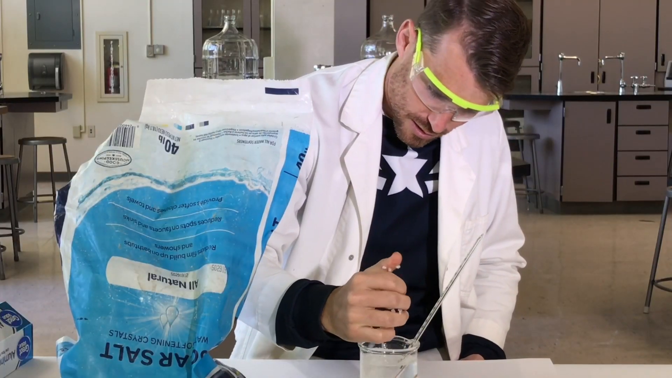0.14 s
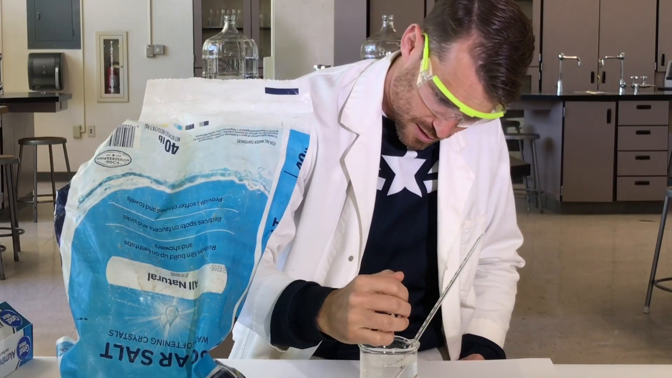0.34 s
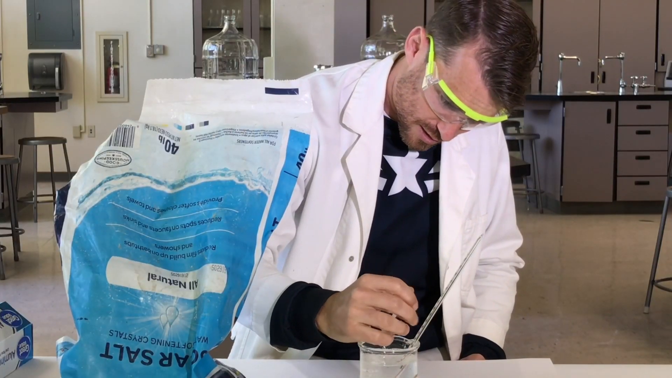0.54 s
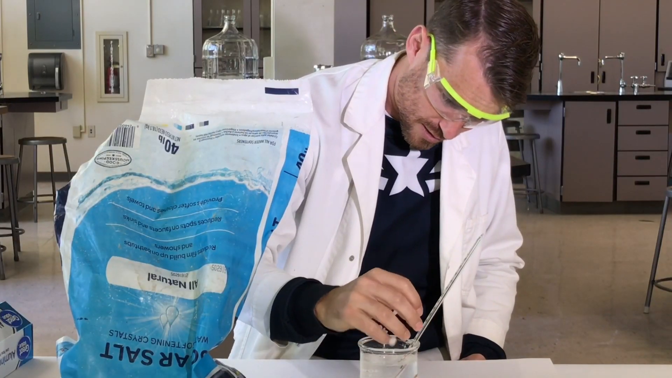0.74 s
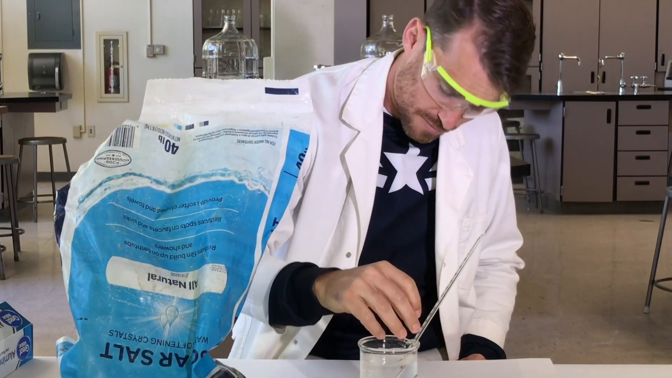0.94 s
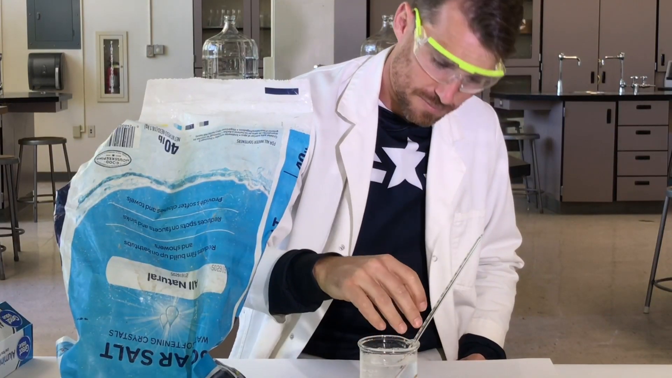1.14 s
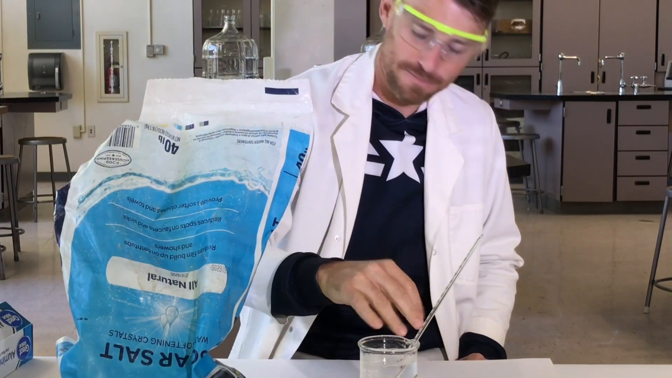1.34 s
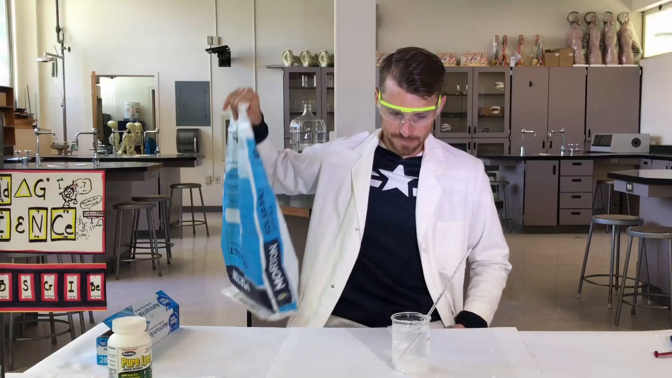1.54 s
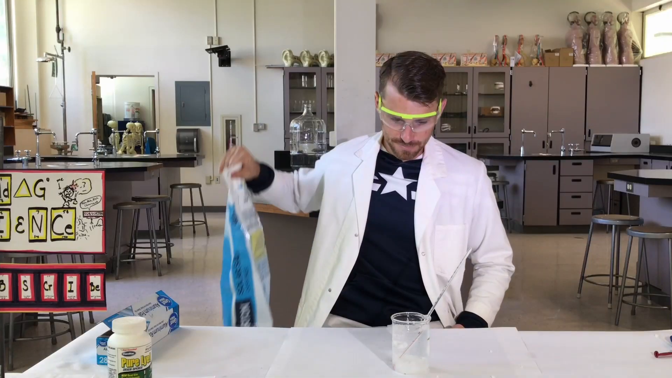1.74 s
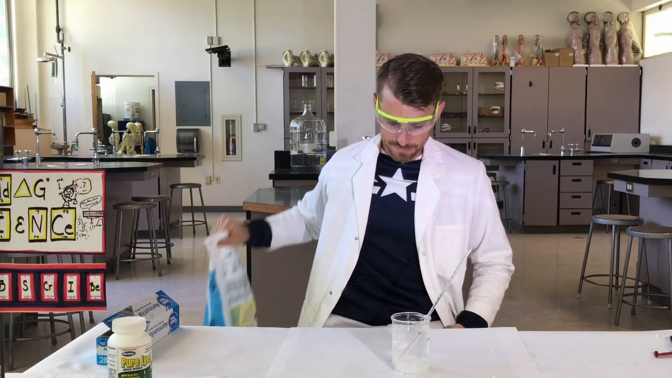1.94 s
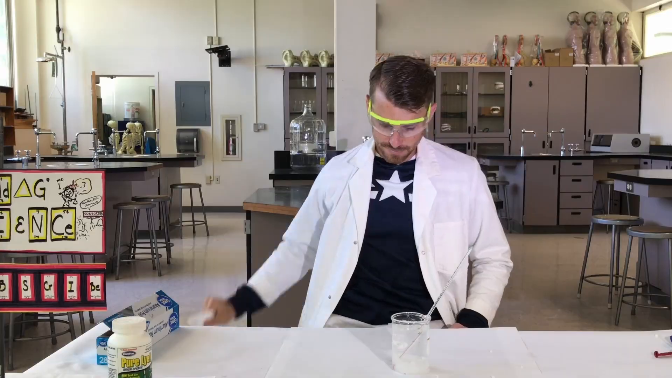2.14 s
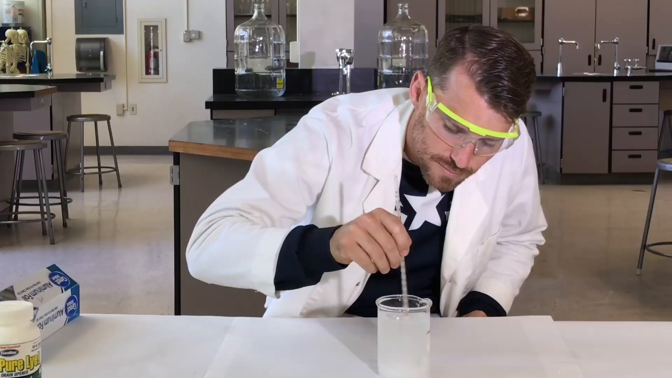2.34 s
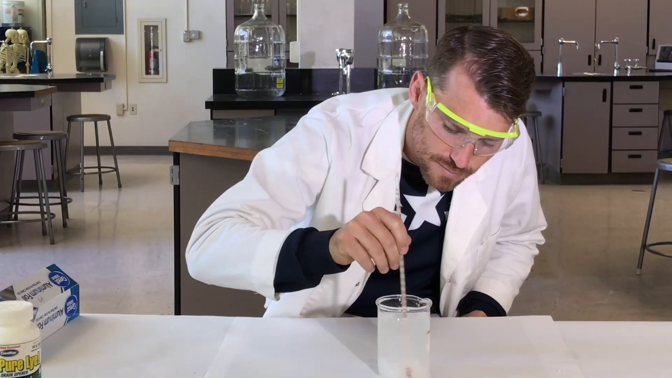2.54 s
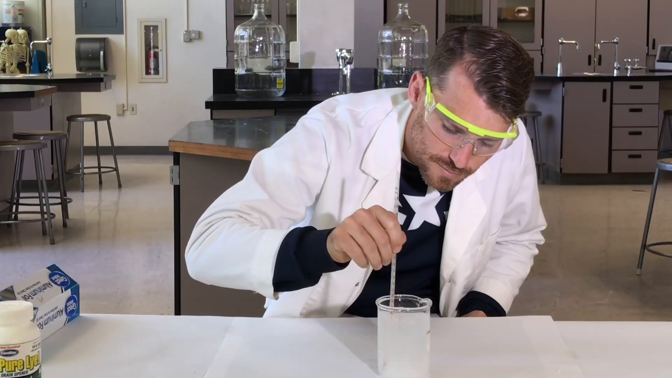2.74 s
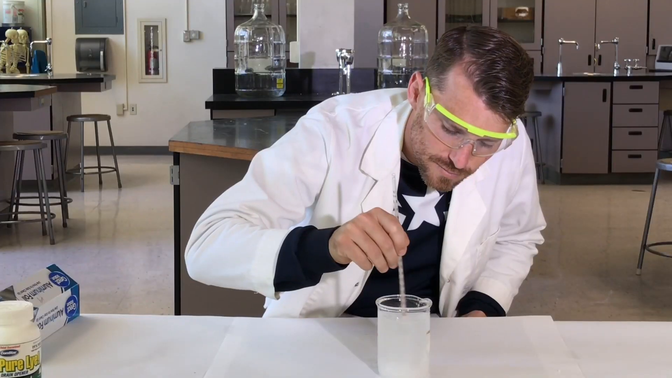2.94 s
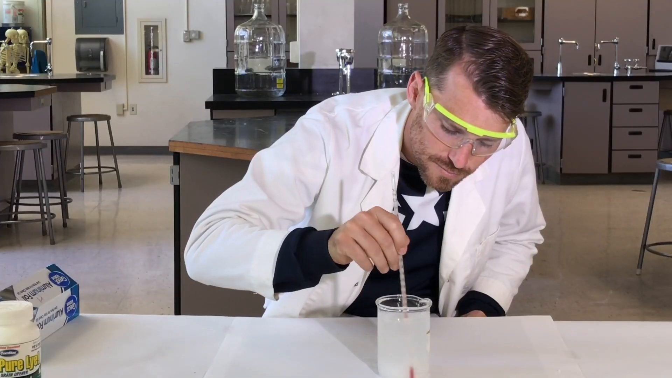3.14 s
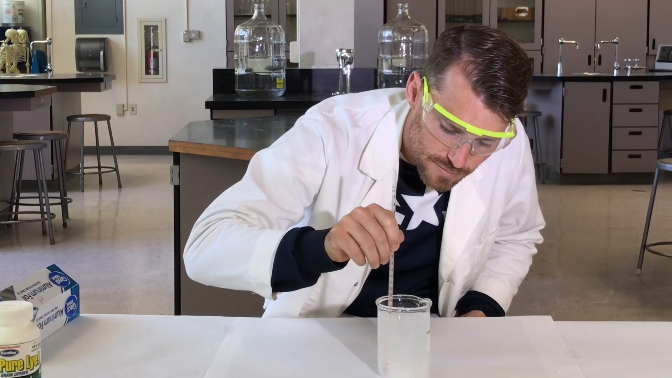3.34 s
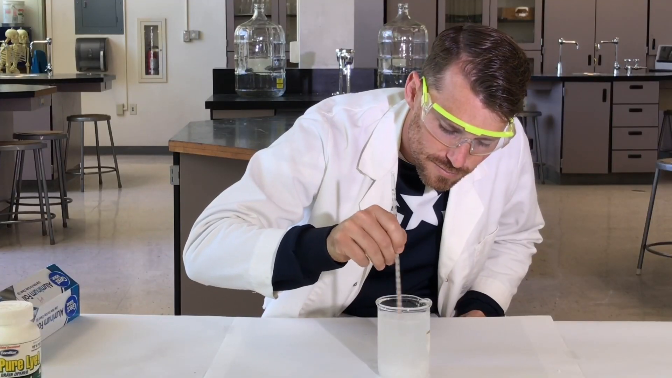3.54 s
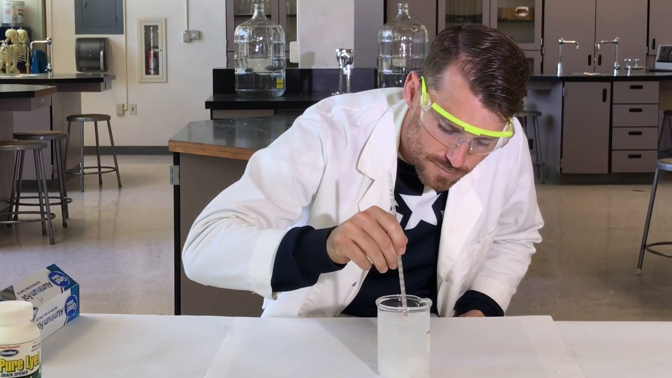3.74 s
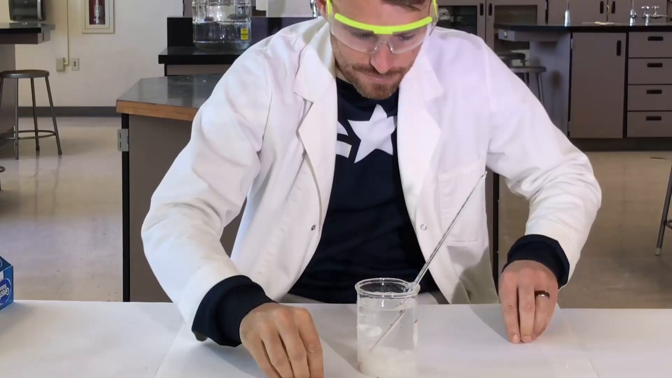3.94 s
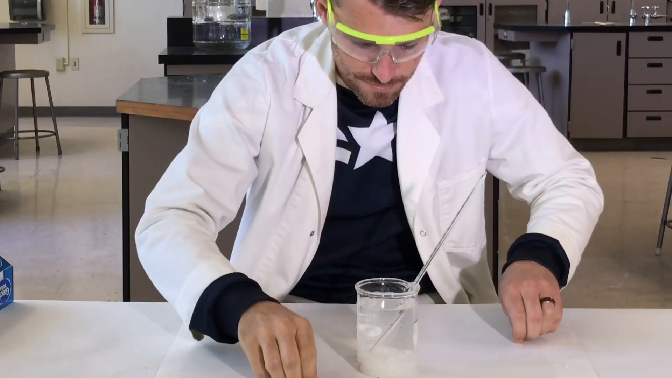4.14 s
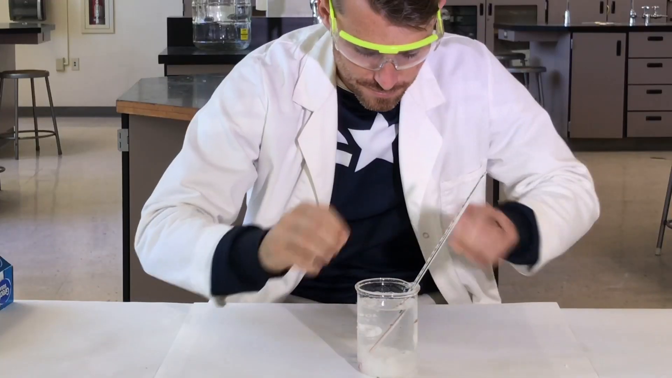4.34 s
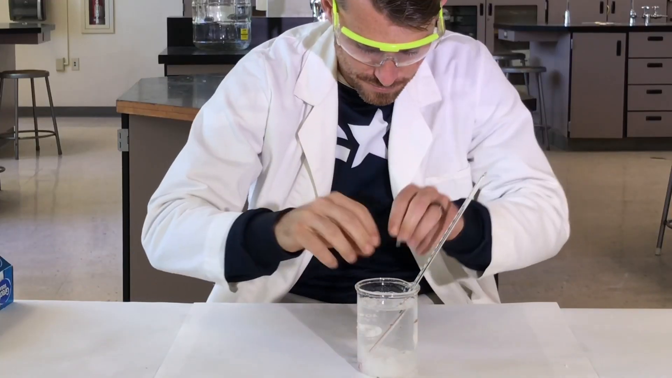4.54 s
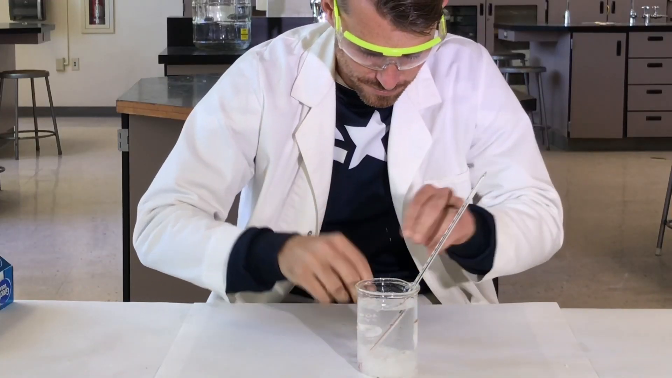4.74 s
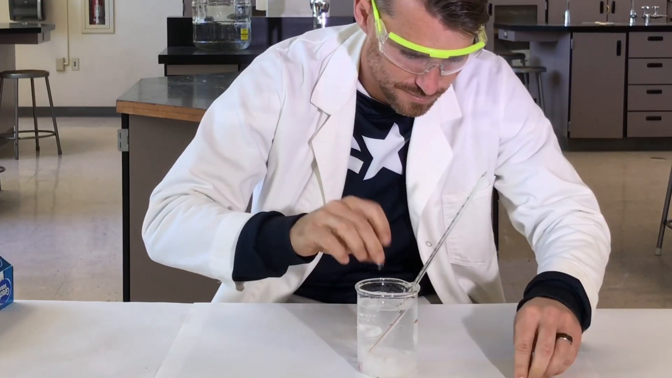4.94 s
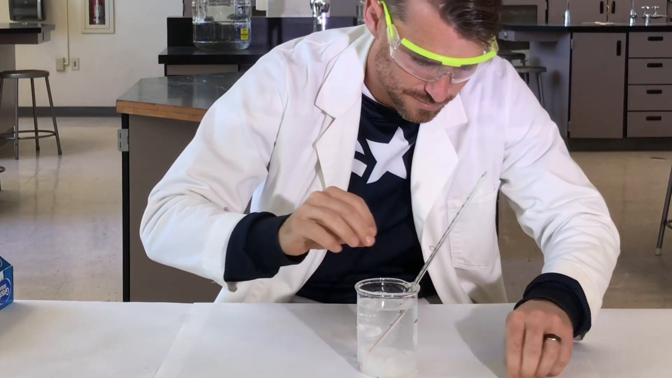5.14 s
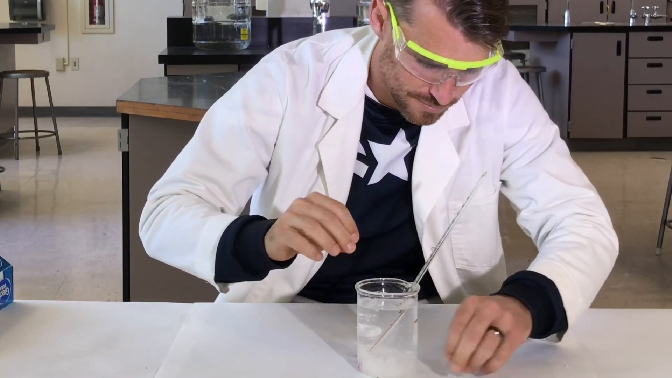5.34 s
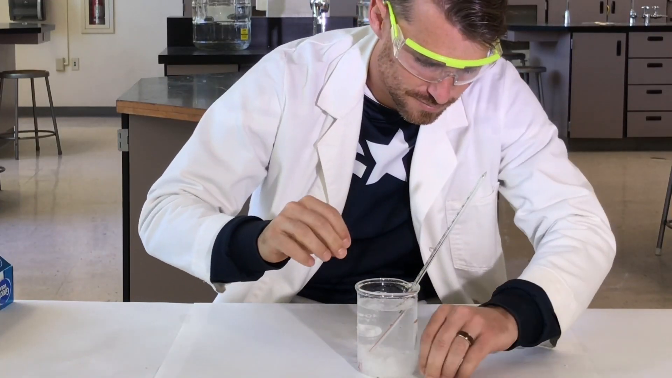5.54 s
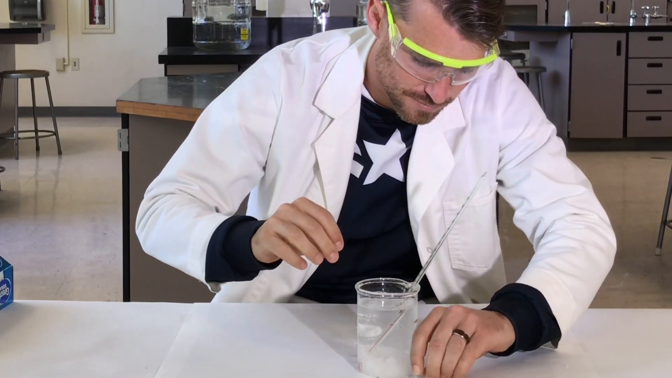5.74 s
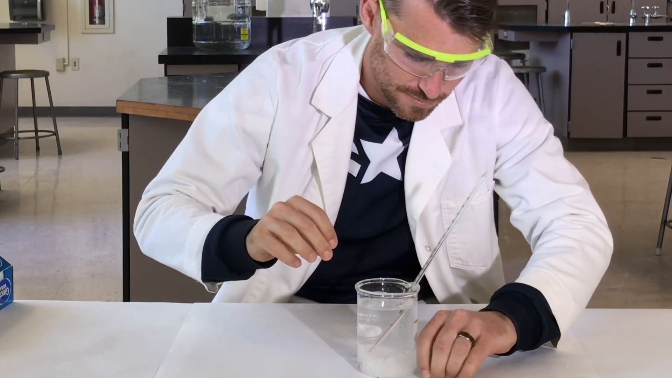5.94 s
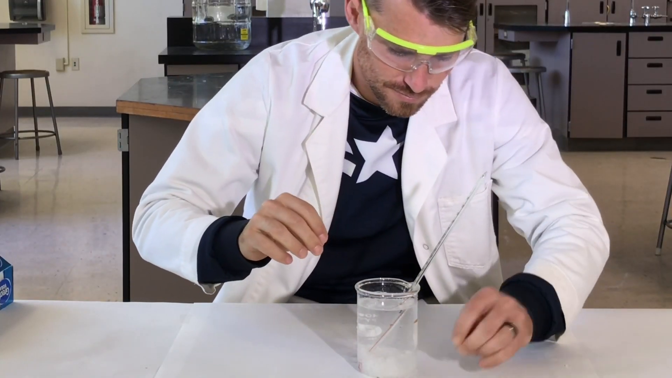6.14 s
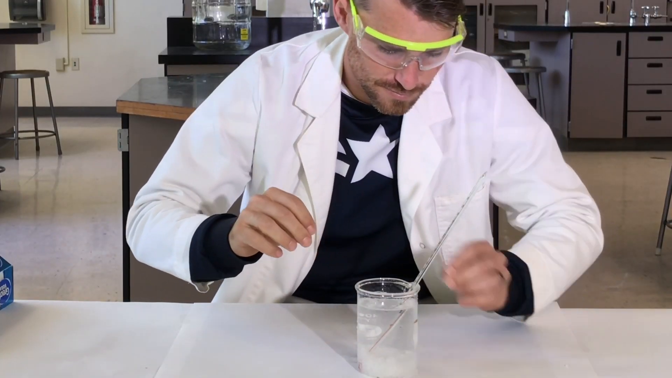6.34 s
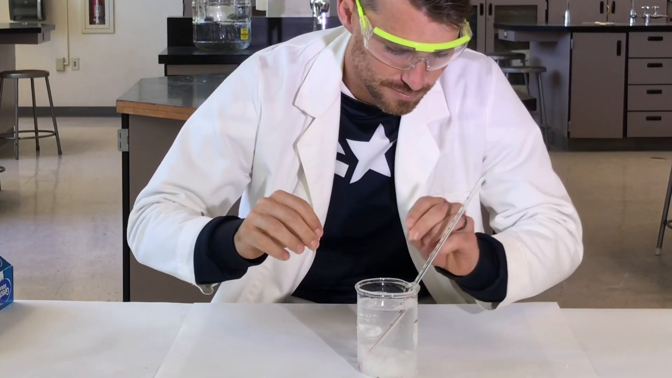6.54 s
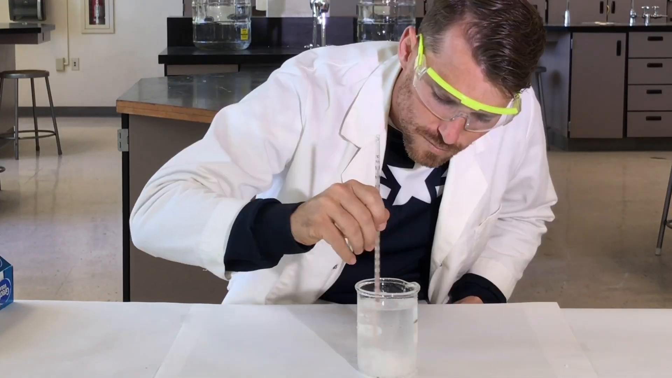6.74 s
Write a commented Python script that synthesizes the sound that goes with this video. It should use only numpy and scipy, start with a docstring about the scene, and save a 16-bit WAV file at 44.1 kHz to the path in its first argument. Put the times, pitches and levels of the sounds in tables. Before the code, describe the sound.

Soft ventilation and low rumble fill a hard-walled lab. From 0 to 1.5 seconds, salt crystals fall close by into a beaker of water: short sinking plops, thin bright ticks and dull glass bumps, strongest around 0.35, thinning out after 1.1. A hand brushes at the start. From 1.5, slightly farther off, a plastic sack crinkles, with sharp snaps near 1.9 and 2.05, then lands with a loud bassy thud at about 2.27. From 2.3 to 3.9, a glass rod stirs dense grit, a bright, crunchy, pulsing scrape about three or four turns per second, with clear clinks near 2.57, 2.9, 3.2 and 3.47. Then it becomes quiet: a muffled hand brush at 4, isolated ticks and plops from 4.6 to 5, a faint drone and soft tone, a tiny slide to 5.5, a glass tap at 5.7, light rustles, a tick at 6.67 and a final brush.

```python
"""Ventilation hums in a hard-walled lab. Salt crystals drop from a hand into a beaker of water: sinking
tones, bumped glass and noisy ticks. A plastic sack crinkles, snaps and lands, all from coloured clicks and noise.
Then a glass rod stirs gritty water, built from dense clicks, and knocks the ringing wall. Last, hands sweep the
bench as swells of brushed cloth, with a few late crystals, a slide down the glass, a drone and a soft tone.
Six stretches are joined by short fades through silence."""
import sys
import numpy as np
from scipy import signal
from scipy.io import wavfile
from scipy.ndimage import uniform_filter1d

SR = 44100
rng = np.random.default_rng(int(sys.argv[2]) if len(sys.argv) > 2 else 0)


def master_out(mix):
    """Clip the mix to full scale and print it as 16-bit PCM to the path in sys.argv[1]."""
    frames = np.transpose(np.atleast_2d(mix))
    ceiling = np.clip(frames, -1, 1)
    pcm = np.round(ceiling * 32767).astype(np.int16)
    wavfile.write(sys.argv[1], SR, pcm)


def gain_from_decibels(decibels):
    """Convert decibel values to linear amplitude factors."""
    exponent = np.asarray(decibels, float) / 20
    return 10 ** exponent


N = 299432  # length in samples

# moments where one stretch gives way to the next: t/s
CUT_TIMES = [1.503, 2.31, 3.943, 4.806, 6.772]
# colour of the ventilation air: f/Hz, level/dB
AIR_COLOUR = [(12, -25), (20, -1), (108, -5), (295, -17), (425, -11), (563, -21.5), (648, -18.5),
              (987, -20), (2100, -24), (2630, -25), (13800, -34), (16300, -41)]
# low rumble, one value per stretch: level/dB
RUMBLE_LEVELS = [-54.5, -52, -51, -53.5, -53.5, -53]
# fan tones: f/Hz, level/dB, width/Hz
FAN_TONES = [(436.19, -64, 9.9), (643.5, -73, 5), (2107.5, -77.5, 14)]
# late low drone: f/Hz, level once swollen/dB, swell/s, later change/(dB per s)
DRONE_TONES = [(76.33, -54, 0.7306, -1.5), (164.09, -59, 0.2002, 4)]
# a soft tone that comes and goes while the hands move: peak t/s, level/dB, rise/s, fall/s (20 dB each)
MOAN_SWELLS = [(4.9, -60, 0.3178, 0.3966), (5.17, -60.5, 0.3978, .2), (6.01, -55, 0.193, .12)]
# how long the lab echoes at each pitch: f/Hz, time to fall 60 dB/s
LAB_ECHO = [(150, 1), (600, 0.47), (2000, 0.75), (6000, 0.53), (14000, .2)]
# hands and sleeves brushing the bench: peak t/s, level/dB, rise/s, fall/s (20 dB each), treble share/dB
BRUSHES = [(0, -45, .01, 0.1093, -3.5), (.06, -54.5, 0.1244, 0.5675, -8.5), (.37, -61, 0.01054, 0.183, 5),
           (3.965, -39.5, 0.04757, 0.04123, -17), (4.02, -57.5, .1, 0.3582, -3), (4.9, -65, .2, .9, -13.5),
           (5.24, -62, 0.1861, 0.0709, -3.5), (5.697, -41.5, 0.01421, 0.03977, 3),
           (5.865, -58.5, 0.0569, .25, -13), (6.0, -52, 0.1872, 0.0582, -6), (6.79, -51, 0.04781, .01, 3)]
# colour of brushed cloth: f/Hz, level/dB
CLOTH_COLOUR = [(180, -55), (300, -7.5), (360, 2.5), (537, -4), (1040, -2), (1870, -8.5), (3240, -16),
                (3580, -17.5), (9880, -17.5), (16000, -38)]
# colour of the plastic sack: f/Hz, level/dB
PLASTIC_COLOUR = [(150, -16.5), (290, -4.5), (373, 7), (510, -5), (680, -0.5), (850, -4), (1020, -2),
                  (1760, -12), (3170, -14.5), (5800, -34.5), (12500, -44.5), (16400, -39.5)]
# sack crinkling in the hand: t/s, level/dB
SACK_CRINKLE = [(1.52, -58), (1.618, -59), (1.626, -44), (1.75, -55), (1.8, -47), (1.92, -50),
                (2.238, -46.5)]
# folds of the sack snapping: t/s, level/dB, top edge f/Hz, time to fall 60 dB/s
SACK_SNAPS = [(1.623, -33.5, 3240, 0.02159), (1.703, -40, 2600, 0.01384), (1.782, -39, 2002, 0.1281),
              (1.79, -36, 3304, .02), (1.797, -33, 2400, 0.03228), (1.807, -35, 1401, 0.02265),
              (1.845, -38, 3000, 0.01366), (1.894, -18, 9390, 0.016855), (2.05, -20, 7900, .017),
              (2.085, -38, 4800, 0.01958), (2.118, -38, 3500, 0.02166), (2.226, -34.5, 3000, .03)]
# force of the sack landing: t/s, level/dB
SACK_LANDING = [(2.241, -46), (2.248, -25), (2.262, -18), (2.274, -3), (2.286, -15.5), (2.312, -27.5)]
# modes of the water-damped beaker on the bench: f/Hz, level/dB, time to fall 60 dB/s
BEAKER_MODES = [(373.52, 3, 0.07247), (501.73, -3, 0.06094), (627.21, -3, 0.05835), (672.54, -2.5, 0.026),
                (854.1, -2.5, 0.03284), (1038.8, -5.5, 0.049), (1210, -3, .05), (1408.4, -6, 0.06295),
                (1642.5, -9, 0.03258), (1900, -8, 0.027), (2158.5, -4.5, 0.044), (2400, -1.5, 0.04883),
                (2660.4, -2, 0.045), (3308, 3, 0.16), (3402.5, -2.5, 0.037), (3977, 1, .03)]
# lumps and hands bumping the beaker: t/s, peak level/dB, strongest f/Hz, rebounds fade over/s
BEAKER_BUMPS = [(.002, -29.5, 452.4, 0.02742), (0.029, -33, 448.3, 0.02615), (.354, -24.5, 610.7, 0.00671),
                (.355, -27.5, 1385, 0.010227), (5.69, -44, 2600, 0.0164), (5.692, -36, 1250, 0.017295)]
# rod against the wall: t/s, peak level/dB, strongest f/Hz, level of the drag that follows/dB, drag delay/s
ROD_BLOWS = [(2.324, -26, 1154, -41.5, 0.008267), (2.563, -28.5, 1114, -50.5, .005),
             (2.573, -18, 946.2, -39, 0.009999), (2.866, -33.5, 1210, -56, 0.01077),
             (2.905, -18, 1211, -42.5, .021), (3.207, -18.5, 1071, -43.5, 0.01193),
             (3.473, -18.5, 1028, -41, 0.01202)]
# colour of grit scratching the glass: f/Hz, level/dB
GRIT_COLOUR = [(1500, -61.5), (2400, -34), (3300, -12), (3800, -10), (4160, -5.5), (4700, -8), (5700, -2),
               (6800, -3), (7750, -1), (9700, -4.5), (11100, -11.5), (13000, -7), (15500, -16.5),
               (16400, -25)]
# small high modes of the rod, pinged by single grains: f/Hz, width/Hz
ROD_MODES = [(2750, 150), (4200, 200), (5750, 150), (7780, 190), (8420, 148.9), (9600, 220), (12900, 300)]
# crystals crushed under the rod: t/s, level/dB
CRUSHES = [(2.39, -37), (2.503, -38), (2.616, -36), (3.048, -35.5), (3.057, -37), (3.077, -39),
           (3.088, -38.5), (3.1144, -31.5), (3.124, -42), (3.186, -35), (3.245, -37), (3.365, -31),
           (3.41, -32), (3.652, -29)]
# crystals sliding down the glass, a single row: peak t/s, level/dB, rise/s, fall/s (20 dB each)
GLASS_SLIDE = (5.5, -57, 0.1779, 0.0017)
# patter of crystals from the hand: t/s, level/dB
HAND_PATTER = [(0, -66.5), (.5, -70), (.6, -79.5), (.8, -80), (.9, -68), (1.0, -78), (1.4, -78.5)]
# single crystals ticking on glass: t/s, level before a common cut/dB, centre f/Hz
GLASS_TICKS = [(.0438, -21.5, 8383), (.0732, -26.5, 12500), (.1715, -29, 10270), (.192, -20, 13500),
               (.2149, -30.5, 13200), (.2414, -32, 6356), (.3546, -18.5, 8331), (.3684, -22, 4664),
               (.417, -32, 7310), (.4379, -35, 7600), (.6464, -32.5, 5547), (.6664, -29.5, 7104),
               (.8784, -30, 8308), (.9198, -33.5, 7933), (.6305, -35, 8100), (.848, -38.5, 7900),
               (1.1124, -39, 7472), (3.9669, -27, 7072), (4.6089, -41, 5300), (4.61, -42.5, 8001),
               (.8375, -40, 7017), (.8595, -40.5, 10500), (.952, -38.5, 8980), (1.229, -44, 12800),
               (1.331, -46, 7500), (4.753, -45.5, 7593), (5.136, -45.5, 6500), (5.245, -44.5, 7300),
               (5.7194, -39.5, 11000), (6.6702, -30.5, 8530)]
# crystals entering the water: t/s, peak level/dB, settled tone f/Hz, time to fall 60 dB/s
WATER_PLOPS = [(.003, -35.5, 1427, 0.1206), (.108, -44, 2348, 0.01519), (.162, -40.5, 1380, 0.04335),
               (.198, -34.5, 1601, 0.02006), (.217, -37, 1507, 0.01938), (.267, -32, 1396, 0.01604),
               (.305, -31, 1225, 0.02755), (.399, -44.5, 698.1, 0.02945), (0.418, -44, 997.7, 0.0247),
               (.426, -40.5, 3285, 0.00993), (.481, -25, 1247, 0.02179), (.497, -44, 1900, 0.01723),
               (.632, -35.5, 1395, 0.0438), (.667, -23.5, 1010, 0.036), (.85, -28.5, 1004, 0.0447),
               (.864, -38, 2309, 0.02162), (.916, -41, 3045, 0.01348), (.953, -44, 1024, 0.0293),
               (1.065, -40.5, 1981, 0.01432), (4.575, -52, 1348, 0.04047), (4.657, -44, 2427, 0.05516),
               (5.038, -41, 2152, 0.04976)]


def evened(x):
    """Scales a sound to an average (rms) level of 1."""
    return x / np.sqrt(np.mean(x ** 2) + 1e-20)


def curve(rows):
    """Draws a time table out sample by sample; also tells where the table is active."""
    s, *columns = np.transpose(rows)
    t = np.arange(N) / SR
    active = (t >= s[0]) & (t <= s[-1])
    return active, [np.interp(t, s, column) for column in columns]


def read(points, hz):
    """Reads a frequency table, joining its points by straight lines on a log-frequency axis."""
    f, value = np.transpose(points)
    return np.interp(np.log(hz + 1), np.log(f + 1), value)


def coloured(x, points):
    """Gives a sound the wanted spectrum with a filter that only looks back in time (minimum phase)."""
    hz = abs(np.fft.fftfreq(8192, 1 / SR))
    log_gain = np.log(gain_from_decibels(np.maximum(read(points, hz), -90)))
    taps = np.fft.ifft(np.exp(np.conj(signal.hilbert(log_gain)))).real[:4096]
    return signal.oaconvolve(x, taps)[:len(x)]


def band(x, lo_hz, hi_hz):
    """Keeps only the pitches between two edges and evens the level to rms 1."""
    sos = signal.butter(4, [lo_hz, hi_hz], "band", fs=SR, output="sos")
    return evened(signal.sosfilt(sos, x))


def add(mix, s, sound):
    """Mixes a sound in at time s, cutting it off at the end of the mix."""
    part = mix[round(s * SR):][:len(sound)]
    part += sound[:len(part)]


def resonate(x, hz, width):
    """One resonance of gain 1: shifts hz down to zero, smooths there, shifts back up."""
    turn = np.exp(2j * np.pi * hz * np.arange(len(x)) / SR)
    r = np.exp(-np.pi * width / SR)
    return 2 * (turn * signal.lfilter([1 - r], [1, -r], x / turn)).real


def grains(per_s, spread_db):
    """Random clicks of both signs, as from many small grains; a few are large."""
    hit = rng.random(N) < per_s / SR
    size = np.minimum(rng.exponential(1, N), 5)
    sign = np.sign(rng.standard_normal(N))
    return hit * sign * gain_from_decibels(spread_db * size)


def flutter(depth_db, length):
    """Random level wobble, smoothed over length samples."""
    return gain_from_decibels(depth_db * evened(uniform_filter1d(rng.standard_normal(N), length)))


def patchy(x, depth_db):
    """Clumps of grains come and go, each over its own patch of time and pitch."""
    z = signal.stft(x, nperseg=256, noverlap=192)[2]
    field = rng.standard_normal(z.shape[::-1]).T
    field = uniform_filter1d(field, size=7, axis=0)  # smooth over pitch
    field = evened(uniform_filter1d(field, size=20, axis=1))  # smooth over time
    sound = signal.istft(z * gain_from_decibels(depth_db * field), nperseg=256, noverlap=192)[1]
    return evened(sound[:len(x)])


def swell(s, db, rise_s, fall_s):
    """A level that climbs to a peak and sinks, 20 dB over each given time."""
    t = np.arange(N) / SR - s
    return gain_from_decibels(db + 20 * np.minimum(t / rise_s, -t / fall_s))


def rustle(points, per_s, spread_db, split_hz):
    """Grains through a material's colour, as a low and a high part."""
    sound = patchy(coloured(grains(per_s, spread_db), points), 1.8)
    return band(sound, 190, split_hz), band(sound, split_hz, 14500)


def ring(hz, t60, start_hz=0.):
    """A dying tone that may start start_hz too high and settle quickly."""
    settle_s = 0.0023694
    t = np.arange(SR // 5) / SR
    cycles = hz * t + start_hz * settle_s * (1 - np.exp(-t / settle_s))
    return gain_from_decibels(-60 * t / t60) * np.sin(2 * np.pi * cycles)


def chances(count):
    """Luck of each blow: signed mode weights, and sparse random rebounds."""
    shape = count, len(BEAKER_MODES)
    weights = rng.uniform(.5, 1, shape) * rng.choice([-1, 1], shape)
    rebounds = rng.standard_normal((count, 5000)) * (rng.random((count, 5000)) < .012)
    return weights, rebounds


def clatter(sound, length_s, rebounds):
    """A soft blow followed by dying rebounds, each setting off the sound; peak 1."""
    t = np.arange(len(rebounds)) / SR
    hits = (t == 0) + 0.5282 * rebounds * np.exp(-t / length_s)
    blow = signal.oaconvolve(uniform_filter1d(hits, size=7), sound)
    return blow / abs(blow).max()


def lab_tail():
    """Reverberation: sparse reflections of random sign, each band dying at its own speed."""
    taps, at = np.zeros(SR), np.arange(300, SR - 20, 20)
    taps[at + rng.integers(0, 20, len(at))] = rng.choice([-1., 1.], len(at))
    hz, t, z = signal.stft(taps, SR, nperseg=256)
    decay = gain_from_decibels(-60 * t / read(LAB_ECHO, hz)[:, None])
    tail = signal.istft(z * decay, SR, nperseg=256)[1]
    return tail / np.linalg.norm(tail)


def drone():
    """Low sine tones whose pitch wavers slowly; each swells, then keeps drifting in level."""
    start_s, start_db = 4.8023, -15.5
    t, out = np.arange(N) / SR, np.zeros(N)
    waver = uniform_filter1d(uniform_filter1d(rng.standard_normal(N), 6000), 6000)
    waver = 0.1843 * evened(waver)
    since = t - start_s
    for hz, db, swell_s, db_per_s in DRONE_TONES:
        level_db = db + start_db * np.clip(1 - since / swell_s, 0, 1)
        level_db += db_per_s * np.maximum(since - swell_s, 0)
        tone = np.sqrt(2) * np.sin(2 * np.pi * hz * t + hz / 160 * waver)
        out += (since > 0) * gain_from_decibels(level_db) * tone
    return out


def ventilation():
    """Smooth air noise and lumpy rumble, with noise through narrow resonances as tones, and a drone."""
    air_noise, tone_noise = rng.standard_normal((2, N))
    air = coloured(air_noise, AIR_COLOUR)
    rumble_db = np.take(RUMBLE_LEVELS, np.searchsorted(CUT_TIMES, np.arange(N) / SR))
    out = gain_from_decibels(-63) * band(air, 230, 16500)
    out += gain_from_decibels(rumble_db) * flutter(2.8, 5000) * band(air, 18, 220)
    out += sum(gain_from_decibels(db) * evened(resonate(tone_noise, hz, width)) for hz, db, width in FAN_TONES)
    moan = evened(resonate(tone_noise, 362.66, 12))
    return out + drone() + sum(swell(*row) for row in MOAN_SWELLS) * moan


def sweeps():
    """Hands and sleeves brush the bench: many tiny catches of cloth that swell and fade."""
    low, high = rustle(CLOTH_COLOUR, 15000, 4.446, 3283.7)
    return sum(swell(s, db, rise_s, fall_s) * (low + gain_from_decibels(treble_db) * high)
               for s, db, rise_s, fall_s, treble_db in BRUSHES)


def sack_snaps():
    """Folds snap as short noise bursts, the loud ones with a clean crack first, and leave loose crinkle."""
    hard_db, crack = -30, 9  # snaps above hard_db start with one sample of this height
    out, t = np.zeros(N), np.arange(12000) / SR
    noise, loose = rng.standard_normal((len(SACK_SNAPS), 12000)), flutter(5, 250)[:12000]
    noise[:, 0] = [crack * (row[1] > hard_db) for row in SACK_SNAPS]
    for (s, db, top_hz, t60), n in zip(SACK_SNAPS, noise):
        treble = band(n, top_hz, min(3 * top_hz, 15500))
        burst = band(n, top_hz / 6.5, top_hz) + gain_from_decibels(-17) * treble
        # the loose crinkle keeps half of the snap's own colour
        crinkle = band(n, min(1800, top_hz / 3), min(4404.4, top_hz)) + .5 * burst
        after = gain_from_decibels(-22 - 60 * t / .55) * loose * crinkle
        add(out, s, gain_from_decibels(db) * (gain_from_decibels(-60 * t / t60) * burst + after))
    return out


def sack():
    """Many small folds crinkle and some snap; the landing is bright first, with a bass thump."""
    low, high = rustle(PLASTIC_COLOUR, 6000, 3.5, 5000)
    on, (db,) = curve(SACK_CRINKLE)
    crinkle = on * gain_from_decibels(db) * (low + gain_from_decibels(-20) * high)
    on, (db,) = curve(SACK_LANDING)
    force = on * gain_from_decibels(db)
    thump = np.sin(2 * np.pi * 92 * np.arange(N) / SR) + 0.51 * band(rng.standard_normal(N), 110, 260)
    treble_lead_s = 0.0031
    bright = gain_from_decibels(-7) * np.roll(force, -round(treble_lead_s * SR)) * high
    return crinkle + sack_snaps() + force * (low + gain_from_decibels(-10) * thump) + bright


def beaker(hz, octaves, weights, ring_share):
    """Ringing modes of the glass, those within some octaves of hz struck hardest; peak 1."""
    body = 0
    for weight, (f, db, t60) in zip(weights, BEAKER_MODES):
        strike_db = db - 6 * (np.log2(f / hz) / octaves) ** 4
        body = body + weight * gain_from_decibels(strike_db) * ring(f, ring_share * t60)
    return body / abs(body).max()


def wall_drag():
    """After each knock the rod sticks and slips along the wall, and the slips excite the glass modes."""
    hold_s, t60_s = 0.024795, 0.126
    out, t = np.zeros(N), np.arange(8000) / SR
    slips = grains(5000, 2.5) * flutter(1.5, 250)
    modes = sum(gain_from_decibels(db) * resonate(slips, hz, 3.5 / t60) for hz, db, t60 in BEAKER_MODES)
    drag = band(modes, 580.85, 1475.9)
    for s, _, _, db, after_s in ROD_BLOWS:
        level = gain_from_decibels(db - 60 * np.maximum(t - hold_s, 0) / t60_s)
        add(out, s + after_s, level * drag[round(s * SR):][:len(t)])
    return out


def knocks():
    """Blows ring the glass and chatter against the crystals; the bench thumps below."""
    out = np.zeros(N)
    bench = 0.17374 * ring(202.19, 0.08807) + 0.1507 * ring(45, 0.05327)
    # a lump shakes the bench less than the rod does
    blows = [(*row, 1, -9.5) for row in BEAKER_BUMPS]
    # rod and crystals pressed on the wall shorten its ring
    clatter_s, ring_share = 0.00845, 0.7928
    blows += [(s, db, hz, clatter_s, ring_share, 0) for s, db, hz, *_ in ROD_BLOWS]
    for blow, weights, rebounds in zip(blows, *chances(len(blows))):
        s, db, hz, length_s, share, bench_db = blow
        struck = beaker(hz, 0.82656, weights, share) + gain_from_decibels(bench_db) * bench
        add(out, s, gain_from_decibels(db) * clatter(struck, length_s, rebounds))
    return out + wall_drag()


def stirring():
    """Dense grit scratches the glass in patches and bursts, pings the rod and rattles the beaker's modes."""
    from_s, to_s, grit_db, rattle_db = 2.312, 3.945, -43, -48
    turn_s, hardest_s, press_db = .284, 2.745, 2.5  # the rod presses hardest once a turn
    crush_s = .0025
    t = np.arange(N) / SR
    on = (t > from_s) & (t < to_s)
    press = press_db * np.cos(2 * np.pi * (t - hardest_s) / turn_s)
    grit = grains(12000, 4.3) * flutter(1.8, 400)

    modes = sum(gain_from_decibels(db) * resonate(grit, f, 7 / t60) for f, db, t60 in BEAKER_MODES[2:])
    rattle = evened(evened(modes) + .5 * band(grit, 610, 3495.2))
    pings = sum(evened(resonate(grains(300, 3.5), hz, width)) * flutter(2.5, 1500)
                for hz, width in ROD_MODES)
    scrape = evened(coloured(grit, GRIT_COLOUR) * flutter(1.3, 90))
    scratch = patchy(scrape + .17 * pings, 2.6)

    crush = sum(gain_from_decibels(db) * np.exp(-((t - s) / crush_s) ** 2) for s, db in CRUSHES)
    powder = evened(coloured(rng.standard_normal(N), GRIT_COLOUR))
    rattle_level = on * gain_from_decibels(rattle_db + 0.51 * press) + gain_from_decibels(-11.5) * crush
    slide = swell(*GLASS_SLIDE) * evened(resonate(grit, 2551.8, 500))
    return on * gain_from_decibels(grit_db + press) * scratch + crush * powder + rattle_level * rattle + slide


def ticks():
    """Crystals crack on glass as tiny dying noise bursts, over a random patter while the hand pours."""
    out, t = np.zeros(N), np.arange(400) / SR
    for (s, db, hz), n in zip(GLASS_TICKS, rng.standard_normal((len(GLASS_TICKS), 400))):
        crack = evened(resonate(n, hz, 1900)) + 0.1525 * band(n, 1908, 16000)
        add(out, s, gain_from_decibels(db - 11.5 - 60 * t / 0.01242) * crack)
    on, (pour_db,) = curve(HAND_PATTER)
    patter = sum(evened(resonate(grains(70, 4.1), hz, 2485)) for hz in (5500, 8500, 12500))
    return out + on * gain_from_decibels(pour_db) * patter


def plops():
    """Each crystal plops into the water with a tone that sinks, together with a bump of the glass."""
    out = np.zeros(N)
    for (s, db, hz, t60), weights, rebounds in zip(WATER_PLOPS, *chances(len(WATER_PLOPS))):
        thud_db = -9 - 6 * np.log2(hz / 1000)  # small crystals, with higher tones, bump less
        thud = gain_from_decibels(thud_db) * beaker(537.4, 0.815, weights, 0.684)
        drop = ring(hz, max(t60, .008), start_hz=220.02) + thud
        add(out, s, gain_from_decibels(db) * clatter(drop, .007, rebounds))
    return out


def scene():
    """Each stretch has its own reverberation and fades at its cuts; the beaker is near, the sack farther."""
    fade_s, near_wet_db, far_wet_db = 0.029, -11.5, -9
    air, tail, far = ventilation(), lab_tail(), sack()
    near = sweeps() + knocks() + stirring() + ticks() + plops()
    wet = gain_from_decibels(near_wet_db) * near + gain_from_decibels(far_wet_db) * far
    t, out = np.arange(N) / SR, np.zeros(N)
    cuts = list(CUT_TIMES)
    for start, end in zip([-1] + cuts, cuts + [99]):  # the outer limits lie beyond the sound
        fade = np.clip(np.minimum(t - start, end - t) / fade_s, 0, 1)
        echo = signal.oaconvolve(wet * (fade > 0), tail)[:N]
        out += fade * (near + far + echo + air)
    return out[None]


def top_cut(x):
    """Nothing passes above the cut-off."""
    return signal.sosfilt(signal.butter(12, 16540, fs=SR, output="sos"), x)


def record(dry):
    """A soft ceiling rounds the loudest peaks."""
    ceiling = .93
    mix = ceiling * np.tanh(dry / ceiling)
    return top_cut(mix)


dry = scene()
out = record(dry)
master_out(out)
```